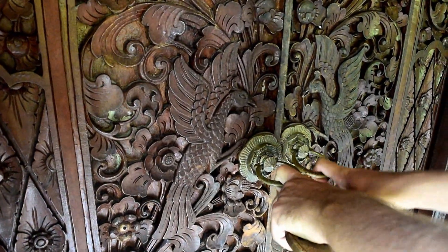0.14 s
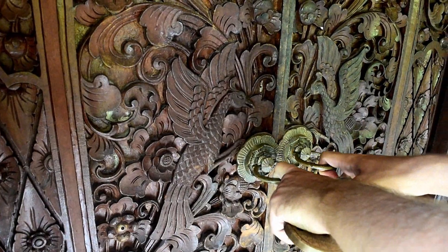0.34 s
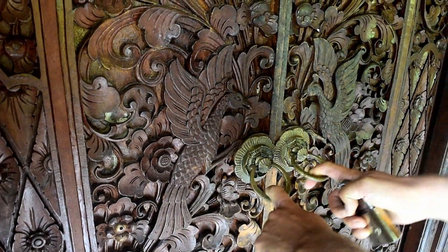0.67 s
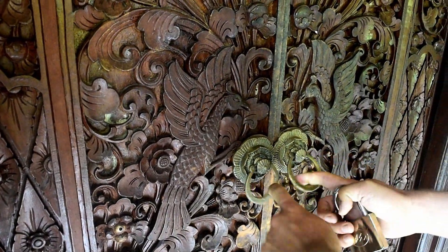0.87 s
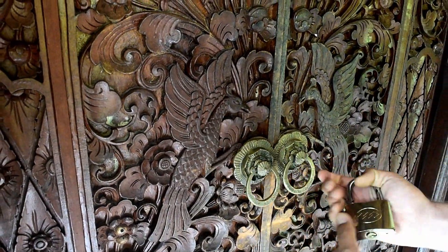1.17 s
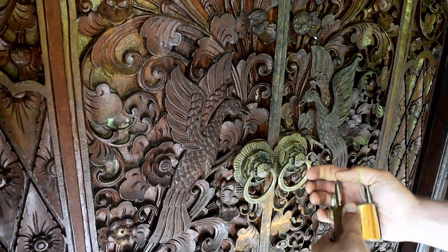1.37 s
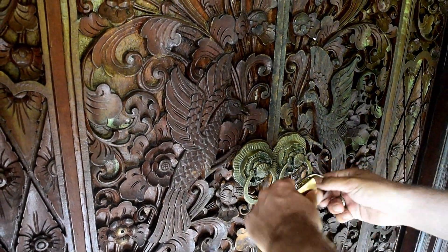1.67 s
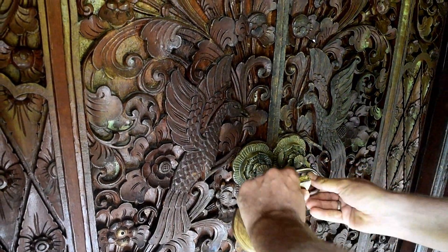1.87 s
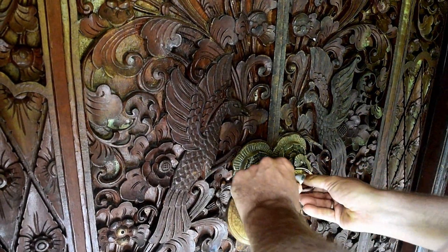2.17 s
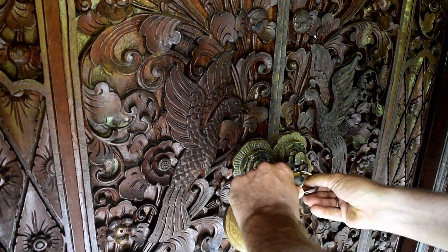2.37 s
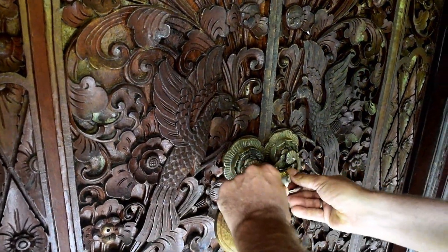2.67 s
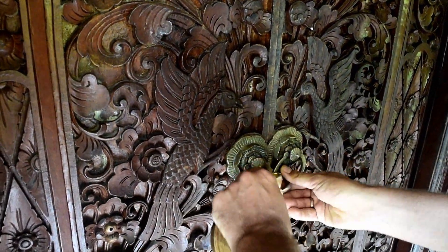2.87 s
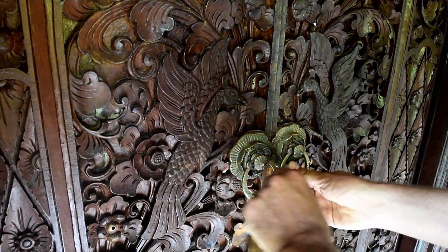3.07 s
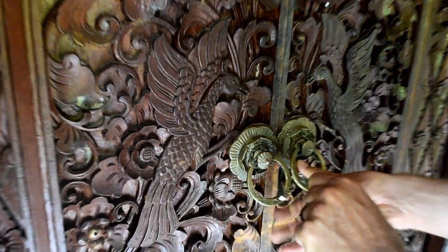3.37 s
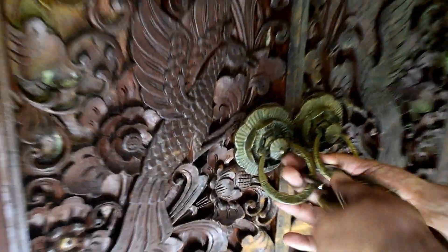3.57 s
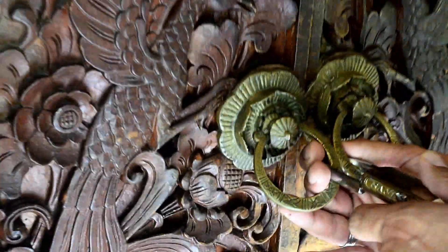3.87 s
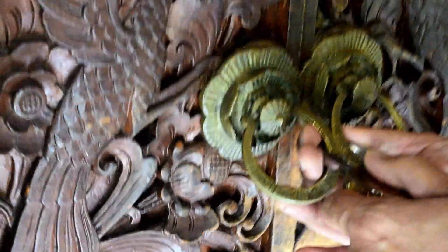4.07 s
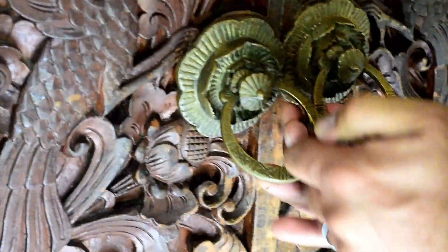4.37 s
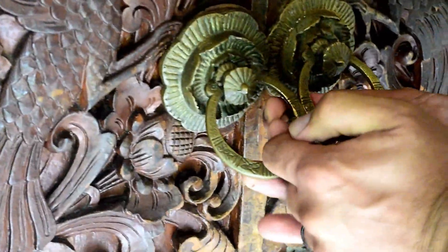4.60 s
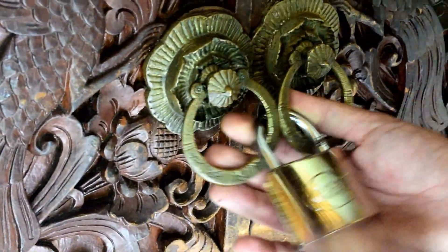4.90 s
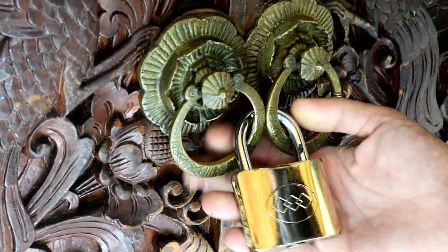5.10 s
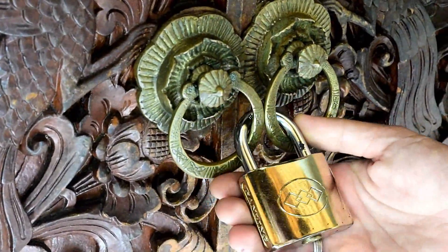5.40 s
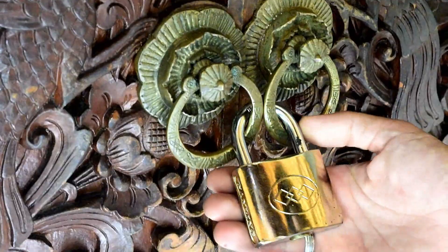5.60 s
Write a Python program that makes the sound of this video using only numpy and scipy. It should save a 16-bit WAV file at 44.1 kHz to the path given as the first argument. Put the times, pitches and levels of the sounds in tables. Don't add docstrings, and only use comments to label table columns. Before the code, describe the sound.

Close handheld pickup of hands fitting a padlock through door rings outdoors: distorted woody slams first, then scattered knocks, metallic rattles and scrapes, a near pause with a tiny key jingle, and renewed clatter. Dry ticking creaks of the camera case follow, then two sharp metallic chatters and light knocks dying away. Short porch reflections, faint hiss, distant hum and a thin rising bird whistle surround it.

```python
import sys
import numpy as np
from scipy import signal
from scipy.fft import rfft, irfft, next_fast_len
from scipy.io import wavfile
from scipy.ndimage import uniform_filter1d, map_coordinates

SR = 44100
rng = np.random.default_rng(int(sys.argv[2]) if len(sys.argv) > 2 else 0)


def waveform_to_disk(signal):
    frames = np.transpose(np.atleast_2d(signal))
    scaled = np.clip(frames, -1, 1) * 32767
    samples = np.round(scaled).astype(np.int16)
    wavfile.write(sys.argv[1], SR, samples)


def boost(x):
    u = np.asarray(x, float) / 20
    return 10 ** u


N = 253442
SPAN = 16384

# f/Hz, width/Hz, level/dB
WOOD = [(315, 48, -3.5), (370, 103, -7), (477.3, 30.4, -4), (573, 236, -6), (600, 58, 3.5),
        (744.8, 26.4, 3), (880, 127, 0.5), (1020, 219, 9.5), (1052, 177, 6), (1262, 70, 0), (1430, 480, -7),
        (2070, 1065, -2.5), (2840, 600, -13.5)]
# f/Hz, width/Hz, level/dB
GRAIN = [(1300, 1800, -0.5)]
# f/Hz, width/Hz, level/dB
PANEL = [(76.3, 5, -7.5), (97, 58, -8), (114.4, 16.6, 1.5), (162.5, 13.1, 2), (245.3, 53, -6.5),
         (331.5, 43, -4.5), (392, 120, -7.5)]
# f/Hz, level/dB per Hz
EDGE = [(1200, -39.5), (2500, 7), (4200, 6.5), (6000, -3.5), (8000, 6.5), (10000, 1.5), (14000, -3),
        (16000, -21)]
# f/Hz, width/Hz, level/dB
BRASS = [(4210, 67, -7.5), (4380, 67, 10), (6290, 199, -9), (8270, 250, -4), (8070, 120, -3.5),
         (11250, 120, -7.5), (12030, 160, 3.5), (14620, 300, 3)]

BUMPS = [(.103, 5, 1012, -31), (.4471, -2.5, 942, -23.5), (.4684, -7, 600, -43), (.4868, -14, 600, -22),
         (2.4007, -32, 675, -44), (2.4338, -36, 1000, -18), (3.1216, -18.5, 620, -45),
         (3.1523, -19, 735, -12), (3.9066, -36, 764, -8), (4.387, -43.5, 646, 2),
         (4.7977, -32.5, 500, -41.5)]
SHUDDERS = [(.1242, -1, 718, -24), (.2729, -5.5, 577, -49), (.7915, -25, 740, -44), (.8307, -24, 980, -34),
            (1.7418, -41, 597, -26.5), (2.3167, -55, 587, -3), (3.066, -32, 810, -8),
            (3.3171, -35.5, 940, -18), (3.627, -31, 976, -25), (4.514, -38.5, 600, -6),
            (4.8783, -33, 970, -18.5), (5.4467, -50, 1223, -5)]
SETTLES = [
    (.1577, -9, 495, -24),
    (.1872, -16, 450, -44),
    (2.2829, -38.5, 1080, -14.5),
]
KNOCKS = [(.2848, -6, 650, -29), (2.13, -23.5, 2080, -32), (.2969, -7, 714, -34), (.508, -17.5, 885, -11),
          (.7698, -34, 890, -23), (.9943, -24.5, 880, -13), (1.5205, -28, 2290, -17),
          (1.5493, -35, 940, -32), (2.273, -18, 735, -11), (2.6906, -17.5, 756, -26),
          (2.7288, -10.5, 575, -9), (3.33, -35.5, 920, -23), (3.4386, -27.5, 570, -42),
          (3.5984, -29.5, 770, -11), (4.146, -33, 634, -47), (4.312, -25, 954, -8),
          (4.3982, -30.5, 600, -11), (4.4512, -35.5, 584, -4.5), (5.0791, -22, 955, -19),
          (5.646, -60.5, 442, -9)]
JOLTS = [(.259, -3, 493, -46), (.356, -20.5, 1980, -46), (.723, -30.5, 880, -9), (2.1193, -20, 1235, 0),
         (2.551, -24.5, 756, -25.5), (2.8124, -26, 720, -14), (3.3949, -24, 740, -7.5),
         (3.5582, -22.5, 665, -2.5), (4.9128, -19.5, 574, -4), (4.9384, -17, 954, -23),
         (5.0354, -26.5, 705, -22), (5.0605, -21.5, 2070, -11.5), (5.0969, -15.5, 934, -10.5)]
DRAGS = [(1.056, -26.5, 730, -11.5), (1.102, -23, 1300, -12), (1.4393, -34.5, 570, -26),
         (3.0555, -27.5, 577, -16), (3.8, -27.5, 947, -22), (4.6577, -18, 920, -15.5),
         (2.648, -17, 1300, -8)]
TAPS = [(.382, -16, 2180, -24), (.5961, -21.5, 723, -11.5), (.671, -31.5, 910, -6.5),
        (.8877, -34, 1020, -12), (1.127, -25.5, 1300, -14), (1.234, -12, 990, -11), (1.2589, -22, 870, -8),
        (1.3403, -28, 1580, -21), (1.3956, -34, 1260, -18), (1.588, -50.5, 910, -11),
        (2.4559, -36.5, 546, -11), (2.918, -34, 1330, -21), (2.951, -18, 684, -6.5),
        (3.0284, -24, 1180, -23), (3.08, -10, 880, -15), (3.2265, -32, 2020, -20),
        (3.2399, -26.5, 1000, -5.5), (3.4645, -25.5, 960, -8), (3.4988, -34, 880, -10),
        (3.6443, -26.5, 974, -8.5), (3.8322, -22, 930, -7), (4.121, -26, 600, -36),
        (4.2741, -29, 1980, -12), (5.5951, -43.5, 430, -10)]
RATTLES = [(.2016, -14, 456, -16.5), (.4112, -30, 2320, -13.5), (.5237, -14, 1180, -25),
           (.5666, -16, 856, -21), (1.1497, -17, 920, -6.5), (1.1758, -19.5, 1020, -13),
           (1.1913, -26, 900, -7), (1.2102, -13.5, 892, -1.5), (1.3058, -31, 905, -10.5),
           (1.5654, -26.5, 880, -6), (1.95, -54, 1950, -2), (1.9985, -45, 2180, 3),
           (2.702, -19, 1720, -11.5), (3.0077, -17.5, 730, -9), (3.0873, -5.5, 1825, -6),
           (4.8526, -24, 963, -41), (5.481, -45, 1694, -6), (5.515, -45, 1430, -5)]
PRESSED = [
    (0.9525, -17.5, 1520, -15),
    (4.566, -4.5, 1770, -5.5),
    (4.6726, -6.5, 1660, 0.5),
]
SLAMS = [
    (.0796, 0, 600, -15),
    (.2525, -3, 600, -30),
    (2.2593, -19, 2320, -12),
]
ROLLS = [(.7445, -21.5, 1114, -16), (.868, -16, 970, -23), (.906, -16.5, 1020, -22.5),
         (2.1735, -3, 907, -5), (3.816, -31, 2300, -6)]
SCRAPES = [(.81, -31, 674, -42), (.925, -29.5, 1150, -33), (2.163, -20, 920, -18), (2.2, -28, 670, -10),
           (3.775, -42, 1500, -11)]
PRESS_T60_S, SLAM_T60_S = .066, .055
# contacts, panel boom level re knock/dB, chatter t60/s, rise/s, strongest mode level/dB
KINDS = [(BUMPS, 0, 0.075, 0.00068, 6.5), (SHUDDERS, -1.5, 0.12, 0.0028, 6.4),
         (SETTLES, 2.25, 0.42, 0.002, 13), (KNOCKS, -11.5, 0.096, 0.0031, 6.8),
         (JOLTS, -7.5, 0.12, 0.0014, 8.5), (DRAGS, -26, 0.25, 0.0063, 3.7),
         (TAPS, -27.5, 0.086, 0.0023, 11), (RATTLES, -13, 0.12, 0.0032, 13.7),
         (PRESSED, -13.5, PRESS_T60_S, 0.0043, 2.6), (SLAMS, -8, SLAM_T60_S, 0.00015, 0),
         (ROLLS, -21.5, 0.084, 0.0031, 10), (SCRAPES, -9, 0.17, 0.011, 5.1)]
# t/s, knock level/dB, wood mode f/Hz, edge level/dB, boom level/dB
SWAYING = [
    (.0015, -31.5, 990, -58, 10),
    (5.19, -46, 600, -26, 13.5),
    (5.362, -68.5, 600, -24, 30.5),
    (5.461, -51, 1560, -5, 5),
]
# t60/s, rise/s, strongest mode level/dB
SWAY = (0.17, .0024, 10)

# t/s, peak level/dB
TINKS = [
    [(1.1497, -27), (3.0264, -40), (3.2382, -34)],
    [(3.3969, -35)],
    [(1.2596, -48)],
]
# f/Hz, level/dB, t60/s
PARTS = [
    [(10300, -6, 0.054), (11400, -4, 0.059), (13350, -18, 0.055), (15000, -19, 0.085)],
    [(7700, -9, 0.061)],
    [(13840, 13, .06)],
]
# t/s, factor by which its first mode rises
FREE_SHACKLE = (2.5, 1.048)
# t/s, slip rate f/Hz, level/dB, loss for each overtone/dB
SQUEAK = [
    [(0, 1100, -46, 18), (.025, 1115, -35, 17), (.06, 1130, -33, 16), (.078, 1140, -33, 15)],
    [(.358, 1400, -37, 8), (.368, 1410, -26, 10), (.382, 1390, -27, 10), (.388, 1370, -40, 10)],
]
# t/s, level/dB
ROCKS = [(0.469, -30), (.62, -46.5), (2.302, -44), (4.8, -43), (5.22, -45)]
# f/Hz, width/Hz, level/dB
LEAF_SWING = [(73, 38, 0)]
# t/s, peak level/dB
JINGLE = [
    (1.95, -50.5),
    (1.992, -38.5),
]
# f/Hz, width/Hz, level/dB
KEY = [(8500, 100, -5), (9000, 270, 4), (10200, 150, 4), (13300, 4200, -1)]
# f/Hz, t60/s
PORCH = [(150, 0.67), (1000, 0.19), (4000, 0.18), (12000, 0.15)]

# f/Hz, level/dB per Hz
CASE = [(300, 13.5), (900, 14), (2500, -5), (5500, -5.5), (7500, -7), (10000, -12.5), (12500, -8.5),
        (15500, -15.5)]
# t/s, peak level/dB
SNAPS = [(3.6044, -28.5), (3.682, -30.5), (3.6944, -39), (3.7084, -33), (3.7164, -33), (3.7304, -36),
         (3.8594, -36), (3.8694, -37), (3.8844, -37), (3.9019, -36), (3.9194, -36), (3.9254, -39),
         (3.937, -39), (3.9558, -33), (3.9793, -34.5), (3.9854, -37), (4.0107, -40), (4.0162, -36),
         (4.0234, -43), (4.0316, -30), (4.0474, -40), (4.0546, -40), (4.0745, -37), (4.125, -36),
         (4.1354, -38), (4.1464, -38), (4.1514, -37), (4.1678, -33), (4.1734, -47), (4.1824, -34),
         (4.1864, -37), (4.2064, -45), (4.2122, -33), (4.2222, -29.5)]
# start t/s, end t/s, slips per second
CREEPS = [(3.572, 3.66, 190), (3.684, 3.74, 150), (3.78, 3.9, 130), (3.96, 4.09, 70), (4.11, 4.24, 90)]
SLIP_DB, SLIP_SCATTER_DB = -46, -3
# t/s, thud level/dB, held/s
GRIPS = [(3.6, -39, 0.028), (3.73, -31, 0), (3.8, -36, 0.039), (3.885, -35, 0.045), (3.97, -29.5, 0.000027),
         (4.025, -30.5, 0.053), (4.14, -36, 0.05), (4.224, -25, 0), (4.33, -36, 0.011),
         (4.39, -33.5, 0.025)]
TIGHTEN_DB_PER_S, LET_GO_DB_PER_S, SLACK_DB = 356, 602, -47
HELD_S = [
    (3.53,),
    (4.46,),
]
# f/Hz, width/Hz, level/dB
HAND_THUD = [(104.6, 75, 25), (170, 23, -14.0)]

# t/s from its start, pitch f/Hz, level/dB
BIRD = [(0, 3600, -66), (.05, 3900, -56), (.12, 4200, -56), (.17, 4750, -53), (.215, 5450, -47),
        (.27, 5700, -47), (.33, 5400, -58)]
# t/s, hoarseness as a share of pitch, level/dB
CALLS_AT = [
    (.882, .015, -2),
    (4.14, .024, -1),
]
# t/s, level/dB
AIR = [(0, -68), (.9, -56), (1.8, -91), (2.8, -59), (3.3, -54), (4.3, -48.5), (5, -56.5), (5.75, -60)]
# f/Hz, width/Hz, level/dB
BREEZE = [(27, 32, 0)]
# f/Hz, level/dB per Hz
HISS = [(40, -3.5), (120, 1), (300, -0.5), (630, -4), (1000, -4.5), (2500, -13), (5000, -14.5), (7000, -20),
        (12000, -25.5), (15500, -29), (16000, -78.5)]
# f/Hz, width/Hz, level/dB
HUM = [(196, 12, -14.5), (240, 36, -3.5), (419.6, 4.1, -4), (602, 26, -7)]


def unit(x):
    return x / np.sqrt(np.mean(x ** 2) + 1e-20)


def along(points, hz):
    f, v = np.transpose(points)
    return np.interp(np.log(hz + 1), np.log(f + 1), v)


def curves(rows):
    s, *cols = np.transpose(rows)
    return [np.interp(np.arange(N) / SR, s, c) for c in cols]


def sounding(rows, fade=0.0079):
    t = np.arange(N) / SR
    inside = np.minimum(t - rows[0][0], rows[-1][0] - t)
    return np.clip(inside / fade + 1, 0, 1)


def wobble(rate):
    knots = rng.standard_normal(int(N * rate / SR) + 4)
    return map_coordinates(knots, [np.arange(N) * rate / SR])


def modes(table, f, scatter_db=0):
    c, w, db = np.transpose(table)[..., None]
    each = 1j * f * w / (c * c - f * f + 1j * f * w)
    sign = (-1) ** np.arange(len(table))
    return (sign * boost(db[:, 0] + scatter_db)) @ each


def causal(points, f):
    cep = irfft(np.log(boost(along(points, f))))
    cep[1:len(f) - 1] *= 2
    cep[len(f):] = 0
    return np.exp(rfft(cep))


def filtered(x, response):
    m = 2 * next_fast_len(x.shape[-1] // 2 + SR // 8)
    spectrum = rfft(x, m) * response(np.fft.rfftfreq(m, 1 / SR))
    return irfft(spectrum, m)[..., :x.shape[-1]]


def peak_one(rows, size):
    return rows / np.sqrt(uniform_filter1d(rows ** 2, size).max(axis=1, keepdims=True))


def place(rows, seconds):
    start = np.round(np.asarray(seconds) * SR).astype(int)
    at = start[:, None] + np.arange(rows.shape[1])
    return np.bincount(at.ravel(), rows.ravel(), N + rows.shape[1])[:N]


def contacts():
    rows = [(*row, *shared) for table, *shared in KINDS for row in table]
    rows = sorted(rows + [(*row, *SWAY) for row in SWAYING])
    s, db, own_hz, edge_db, boom_db, t60, rise, own_db = np.transpose(rows)[..., None]
    pressed = np.isin(s, np.transpose(PRESSED)[0])
    slammed = np.isin(s, np.transpose(SLAMS)[0])
    reach = 2 * SPAN // 3
    t, t60 = np.arange(reach) / SR, np.clip(t60, .02, .5)
    draw = rng.standard_normal((len(s), 2 * reach + 40))
    struck = draw[:, 2 * reach:]

    lumps = boost(2.74 * unit(uniform_filter1d(draw[:, reach:2 * reach], size=40)))
    chatter = draw[:, :reach] * lumps * (1 - np.exp(-t / np.clip(rise, 1e-4, .05)))
    chatter[:, :12] += boost(18) * slammed * np.hanning(12)

    corner_hz = 15000 * boost(0.85 * edge_db)
    dull_hz = 7000 * boost(.45 * edge_db)

    def strongest(f):
        gain = boost(own_db) * (own_hz / 900) ** 0.23
        return gain * 1j * f * 0.075 * own_hz / (own_hz ** 2 - f * f + 1j * f * 0.092 * own_hz)

    def leaf(f):
        many = modes(WOOD, f, 2 * struck[:, :len(WOOD)]) + np.where(pressed, 1.2, .3) * modes(GRAIN, f)
        dull = 1 + 1j * f / dull_hz
        return many / dull ** 2 + strongest(f) / dull

    def metal(f):
        brass = modes(BRASS, f, 5 * struck[:, 20:20 + len(BRASS)])
        return (causal(EDGE, f) + 1.82 * brass) / (1 + 1j * f / corner_hz) ** 3

    def panel(f):
        return modes(PANEL, f, 3 * struck[:, -len(PANEL):])

    stop = np.where(pressed, 3.2, 1.334)
    edge_t60 = np.where(pressed, .9, 0.49 * boost(.25 * edge_db)) * t60
    wood = filtered(chatter * boost(-60 * (1.33 * t / t60) ** stop), leaf)
    edge = filtered(chatter * boost(-60 * t / edge_t60), metal)
    boom = filtered(chatter * boost(-60 * t / (1.1 * t60)), panel)
    sound = peak_one(wood, size=220)
    sound = sound + boost(edge_db + 0.5) * peak_one(edge, size=90)
    sound = sound + boost(boom_db - 5.0) * peak_one(boom, size=530)
    fade = 1 - (t / t[-1]) ** 4
    return place(boost(db - 3.0) * sound * fade, s[:, 0] - .001)


def padlock():
    t, out = np.arange(SPAN) / SR, np.zeros(N)
    threaded_s, rise = FREE_SHACKLE
    for hits, part in zip(TINKS, PARTS):
        for s, db in hits:
            hz, level, t60 = np.transpose(part)[..., None]
            if part is PARTS[0] and s > threaded_s:
                hz = np.vstack([hz[:1] * rise, hz[1:]])
            ring = np.sum(boost(db + level - 60 * t / t60) * np.sin(2 * np.pi * hz * t), axis=0)
            out += place(ring[None] * (1 - np.exp(-t / 0.00081)), [s])
    return out


def rocking():
    s, db = np.transpose(ROCKS)
    t = np.arange(SPAN) / SR
    push = rng.standard_normal((len(s), SPAN)) * boost(-60 * t / .5) * (1 - np.exp(-t / .02))
    swing = filtered(push, lambda f: modes(LEAF_SWING, f) ** 2)
    return place(boost(db[:, None]) * peak_one(swing, size=700), s)


def hinge():
    out = np.zeros(N)
    for rows in SQUEAK:
        hz, db, loss_db = curves(rows)
        turn = 2 * np.pi * np.cumsum(hz * (1 + .006 * wobble(250))) / SR
        stack = sum(boost(-k * loss_db) * np.sin((k + 1) * turn) for k in range(4))
        out += boost(db + 2 + 2 * wobble(120)) * sounding(rows) * stack
    return out


def key():
    s, db = np.transpose(JINGLE)
    t = np.arange(4096) / SR
    rattle = rng.standard_normal((len(s), len(t))) * boost(-60 * t / 0.079) * (1 - np.exp(-t / 0.0042))
    rattle = filtered(rattle, lambda f: modes(KEY, f))
    return place(boost(db[:, None]) * peak_one(rattle, size=90), s)


def camera_case():
    steps = np.concatenate([np.arange(a, b, 1 / rate) for a, b, rate in CREEPS])
    chance = rng.standard_normal((len(steps), 2))
    s, db = np.transpose(SNAPS)
    s = np.append(s, steps + 0.002 * chance[:, 0])
    db = np.append(db, SLIP_DB + SLIP_SCATTER_DB * chance[:, 1])
    t = np.arange(1024) / SR
    decay = boost(-60 * t / 0.004) + 0.16 * boost(-60 * t / 0.06)
    ticks = filtered(rng.standard_normal((len(s), len(t))) * decay, lambda f: causal(CASE, f))
    ticks = place(boost(db[:, None] + 3.5) * peak_one(ticks, size=30), s)

    thuds = unit(filtered(rng.standard_normal(N), lambda f: modes(HAND_THUD, f) ** 2))
    grains = boost(11.0 * wobble(250)) * rng.standard_normal(N)
    rustle = unit(filtered(grains, lambda f: causal(CASE, f)))
    at, thud_db, held = np.transpose(GRIPS)[..., None]
    since = np.arange(N) / SR - at
    tighten_db = TIGHTEN_DB_PER_S * np.clip(-since, 0, None)
    let_go_db = LET_GO_DB_PER_S * np.clip(since - held, 0, None)
    grip_db = np.maximum((thud_db - tighten_db - let_go_db).max(axis=0), SLACK_DB)
    hand = boost(grip_db) * thuds + boost(-52.0 + 0.69 * (grip_db + 42.5)) * rustle
    return ticks + sounding(HELD_S, fade=0.048) * hand


def porch(x, count=23):
    out, step = np.zeros(N + SR), N // count + 1
    for k in range(count):
        hz, t, z = signal.stft(rng.standard_normal(SPAN), SR, nperseg=256)
        decay = boost(-60 * t / along(PORCH, hz)[:, None])
        tail = signal.istft(z * decay, SR, nperseg=256)[1]
        wet = signal.fftconvolve(x[k * step:(k + 1) * step], tail / np.linalg.norm(tail))
        out[k * step + 300:][:len(wet)] += wet
    return out[:N]


def bird():
    out = np.zeros(N)
    for start, hoarse, call_db in CALLS_AT:
        rows = [(start + s, hz, db + call_db) for s, hz, db in BIRD]
        hz, db = curves(rows)
        pitch = hz * (1 + hoarse * (hz / 5500) ** 3 * wobble(400))
        tone = np.sin(2 * np.pi * np.cumsum(pitch) / SR)
        out += boost(db + 1 + 2.5 * wobble(150)) * sounding(rows) * tone
    t = np.arange(SPAN) / SR
    trees = rng.standard_normal(SPAN) * boost(-60 * t / .2)
    return out + boost(-3) * signal.fftconvolve(out, trees / np.linalg.norm(trees))[:N]


def air():
    noise = rng.standard_normal((3, N))
    hiss = boost(-53.0 + 1.8 * wobble(21.0)) * unit(filtered(noise[0], lambda f: boost(along(HISS, f))))
    hum = boost(-57 + 1.5 * wobble(4)) * unit(filtered(noise[1], lambda f: modes(HUM, f) ** 2))
    breeze = unit(filtered(noise[2], lambda f: modes(BREEZE, f) ** 3))
    return hiss + hum + boost(curves(AIR)[0] + 3.2 * wobble(3.8)) * breeze


def scene():
    door = contacts() + padlock() + rocking()
    squeak = hinge()
    answer = boost(-11.5) * porch(door + 0.24 * squeak)
    mix = door + squeak + key() + camera_case() + answer + bird() + air()
    return mix[None]


def low_pass(x):
    return signal.sosfilt(signal.butter(12, 16450, fs=SR, output="sos"), x)


def record(dry):
    clipped = dry / (1 + np.abs(dry / .995) ** 40) ** (1 / 40)
    limited = filtered(clipped, lambda f: 1 / (1 + (f / 16000) ** 60))
    return low_pass(limited)


dry = scene()
out = record(dry)
waveform_to_disk(out)
```